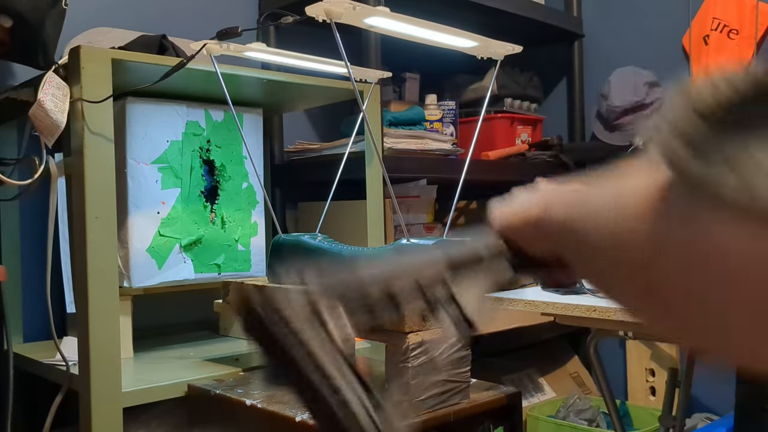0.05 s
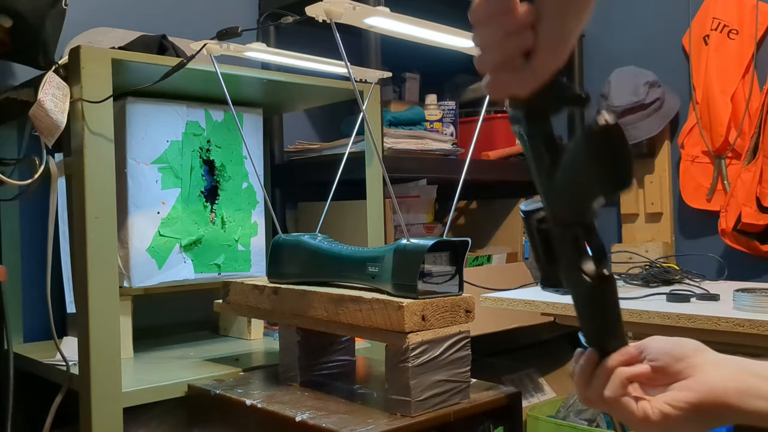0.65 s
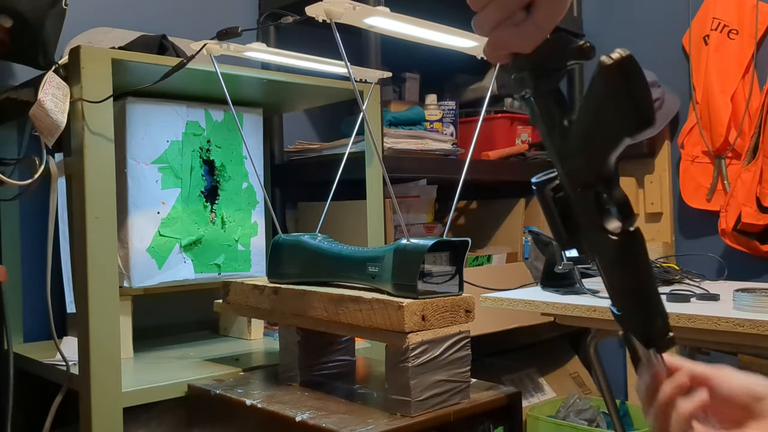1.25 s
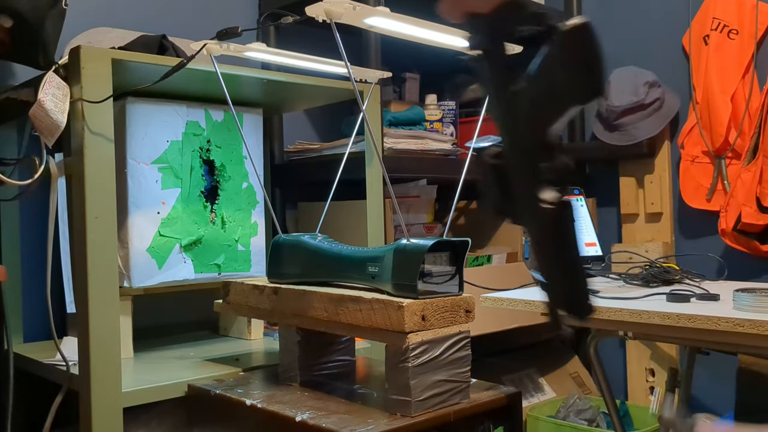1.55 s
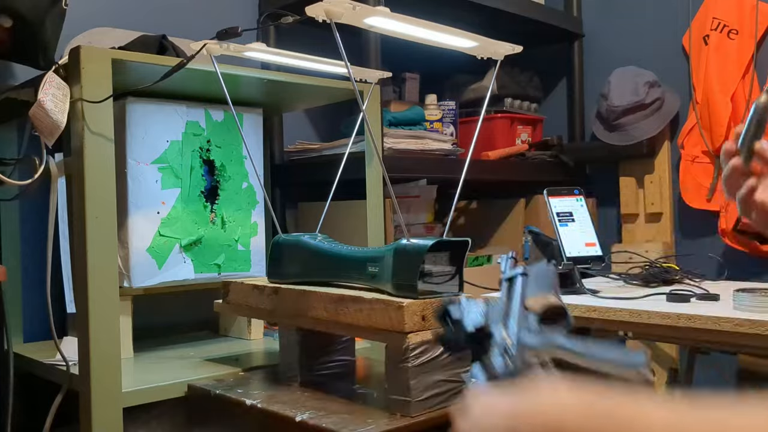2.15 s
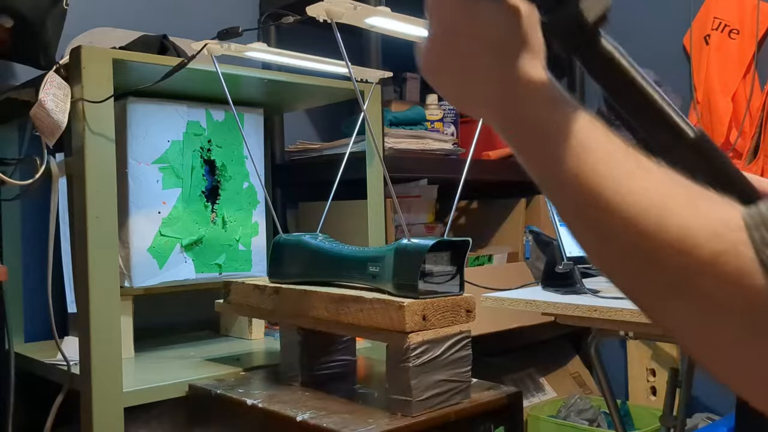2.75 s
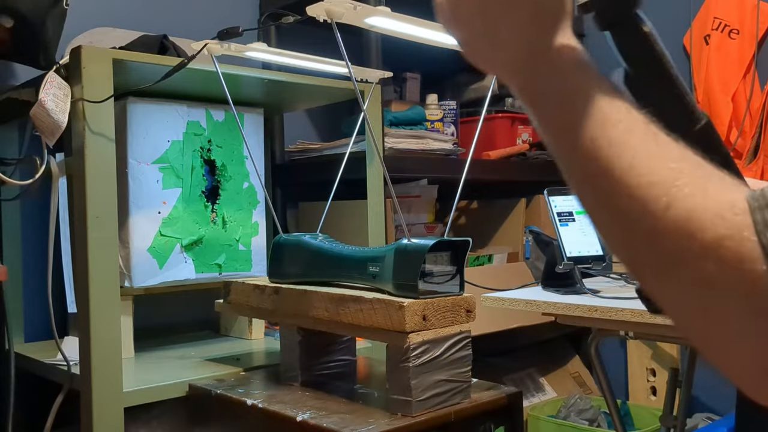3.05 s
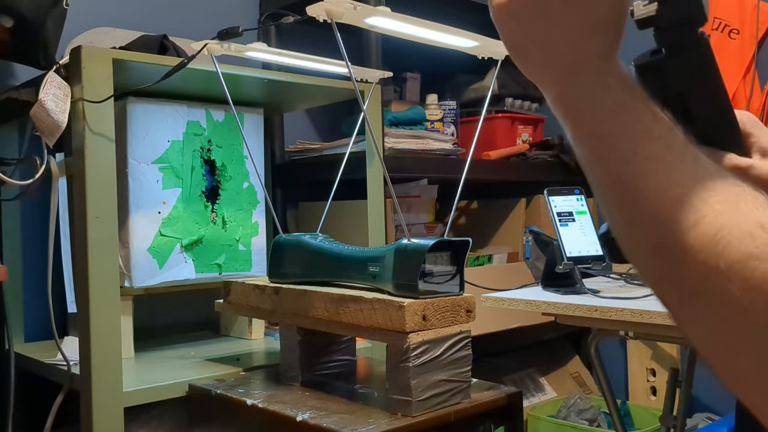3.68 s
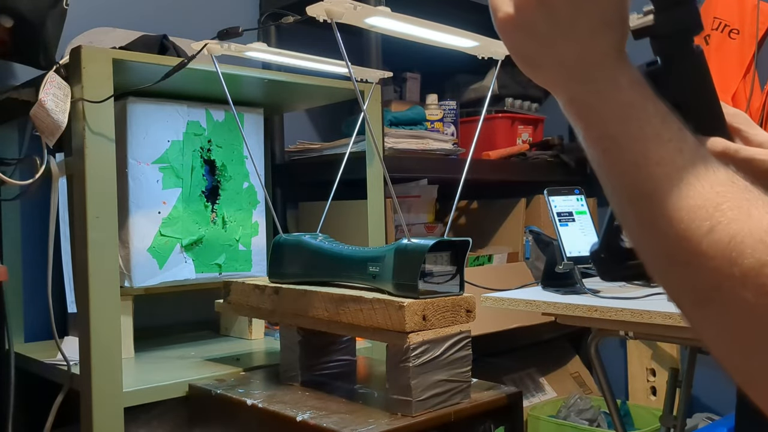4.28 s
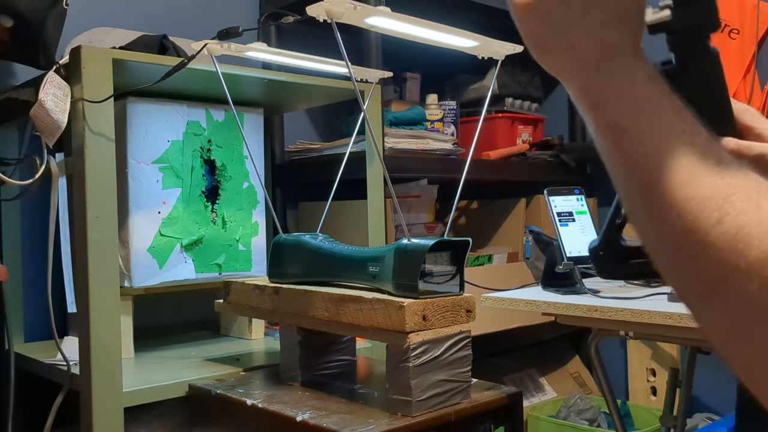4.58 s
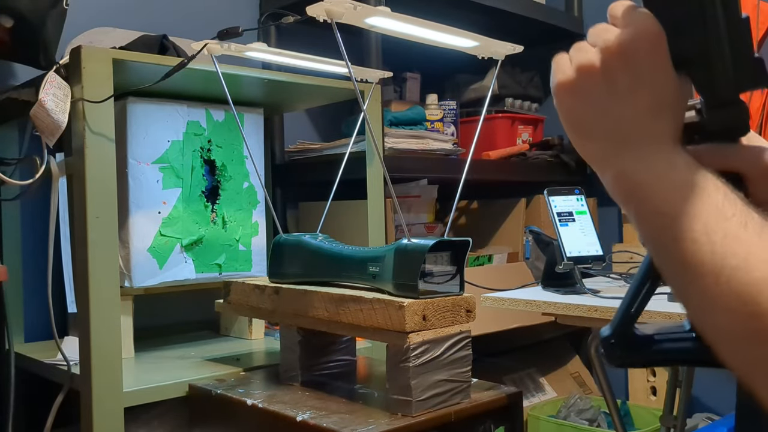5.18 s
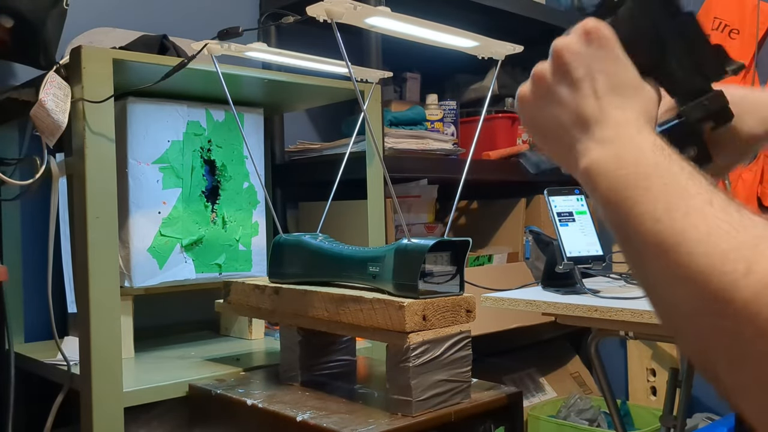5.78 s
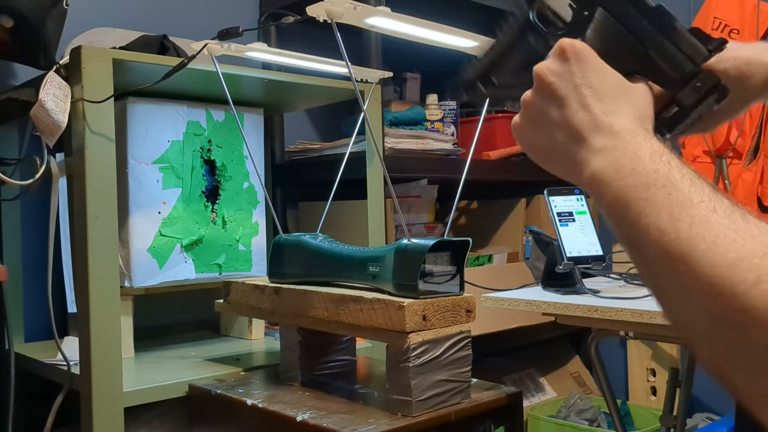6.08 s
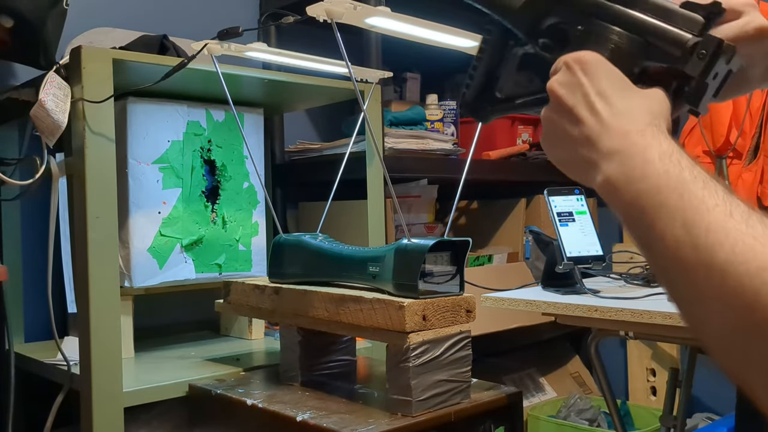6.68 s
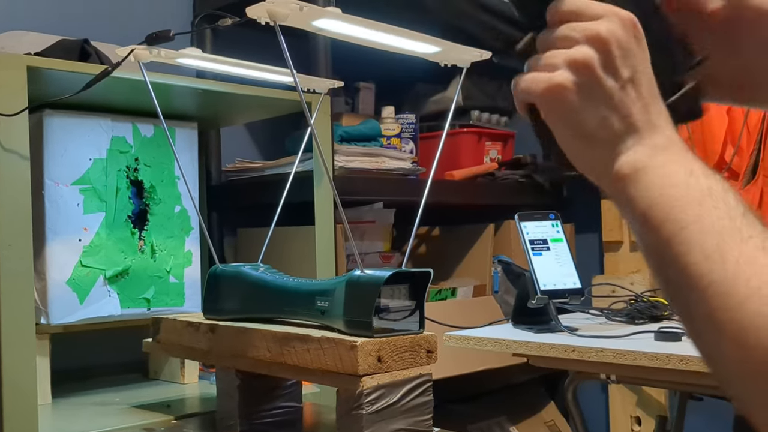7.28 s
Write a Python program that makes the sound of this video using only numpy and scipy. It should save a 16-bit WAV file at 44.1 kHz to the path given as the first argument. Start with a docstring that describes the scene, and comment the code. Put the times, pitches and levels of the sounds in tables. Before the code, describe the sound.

A bolt-action air pistol is handled in a small room with little echo, heard in stereo over a faint, wavering low hum and soft hiss. Light metal rubs and ticks come between 0.4 and 0.8 seconds, then a quick cluster of clicks around 1.3. After a pause, small ringing clicks run from 2.7 to 3.2 seconds. At about 3.4 the bolt scrapes back against its spring with a faint squeak, stopping with a firm click at 3.6. At about 4.3 seconds the pistol dry-fires with one sharp, briefly ringing metallic snap, the loudest sound. A short latch scrape follows at 5.4, light clicks around 5.7, a soft low bump near 6 and more clicks at 6.2. A lever swings with a scrape and latches at about 6.5 seconds. One faint tick at 7 leaves only the hum and hiss.

```python
"""A workbench in a small, cluttered room, with a stereo pair of microphones on a bolt-action air pistol.
The pistol is handled, cocked and dry-fired. Its parts rub, click and ring; the bolt scrapes and squeaks
back against its spring; the hammer lands on the valve with one sharp snap; a lever swings and latches.
Under it all lie a wavering hum near mains pitch and the faint hiss of the room."""
import sys
import numpy as np
from scipy import signal
from scipy.fft import rfft, irfft
from scipy.io import wavfile
from scipy.ndimage import uniform_filter1d

SR = 44100
rng = np.random.default_rng(int(sys.argv[2]) if len(sys.argv) > 2 else 0)


def wrap_up_sound(samples):
    """Save the sound to the file named by the first command line argument, as 16-bit audio."""
    columns = np.atleast_2d(samples).T
    # keep every value between -1 and 1, then stretch to whole-number steps
    tamed = np.clip(columns, -1, 1)
    steps = np.round(tamed * 32767).astype(np.int16)
    wavfile.write(sys.argv[1], SR, steps)


N = 332334
COCK_START_S, COCK_PEAK_S, COCK_STOP_S = 3.335, 3.415, 3.63


def from_db(db):
    return 10 ** (np.asarray(db) / 20)


def rms_one(x):
    return x / np.sqrt(np.mean(x ** 2) + 1e-20)


def in_time(rows):
    return np.interp(np.arange(N) / SR, *np.transpose(rows))


def at_hz(points, hz):
    """Read a table on a logarithmic frequency axis."""
    f, value = np.transpose(points)
    return np.interp(np.log(np.maximum(hz, 1)), np.log(f), value)


def add(track, start_s, sound):
    i = int(round(start_s * SR))
    track[i:i + len(sound)] += sound[:N - i]


def coloured(burst, colour, smooth_bins=50, size=16384):
    """Causal filter that gives a burst the spectrum asked for and leaves its grain in time."""
    spectrum = rfft(burst, size)
    hz = np.arange(len(spectrum)) * SR / size
    broad_power = np.abs(uniform_filter1d(np.abs(spectrum) ** 2, smooth_bins)) + 1e-12
    gain = from_db(at_hz(colour, hz)) / np.sqrt(broad_power)
    cepstrum = irfft(np.log(gain))
    cepstrum[1:size // 2] *= 2   # fold to minimum phase
    cepstrum[size // 2 + 1:] = 0
    return irfft(spectrum * np.exp(rfft(cepstrum)))


def resonate(x, modes):
    """Sum of two-pole resonances driven by x."""
    out = 0
    for hz, width, db in modes:
        r = np.exp(-np.pi * width / SR)
        poles = [1, -2 * r * np.cos(2 * np.pi * hz / SR), r * r]
        out = out + from_db(db) * signal.lfilter([(1 - r * r) / 2, 0, (r * r - 1) / 2], poles, x + 1e-18)
    return out


def diffuse(count, colour):
    """Noise from all sides: alike at both microphones in the bass, unrelated in the treble."""
    # Each row: frequency in Hz, likeness of left and right from 0 to 1.
    likeness = [(100, 0.9), (300, .8), (600, 0.3), (1200, 0), (3000, 0.05), (16000, 0)]
    hz = np.fft.rfftfreq(count, 1 / SR)
    alike = at_hz(likeness, hz)
    mid, side = rfft(rng.standard_normal((2, count)))
    pair = np.sqrt(1 + alike) * mid + np.sqrt(1 - alike) * side * [[1], [-1]]
    return irfft(from_db(at_hz(colour, hz)) * pair, count)


def hum():
    """Two low tones near mains pitch beat slowly against each other, with a few brief dips."""
    # The hum's level: it wavers, and steps down suddenly near 2.6 s.
    # Each row: time in seconds, level in dB.
    levels = [(0, -45.5), (1.15, -43), (2.0, -46), (2.24, -52.5), (2.56, -44.5), (2.68, -50), (3.28, -51.5),
              (3.56, -45), (4.0, -48), (5.4, -48), (5.85, -50.5), (7.05, -48), (7.35, -54)]
    # Each row: time of a dip in seconds, depth in dB.
    dips = [(.6, 15), (1.44, 3.5), (2.16, 5), (5.7, 5.5), (7.28, 3)]
    pitch_hz, beat_hz, upper_db = 58.7, 1.386, -15
    opposed_s, dip_width_s = 4.97, 0.036
    t = np.arange(N) / SR
    lower = np.sin(2 * np.pi * pitch_hz * (t - opposed_s))
    upper = from_db(upper_db) * np.sin(2 * np.pi * (pitch_hz + beat_hz) * (t - opposed_s))
    dip_db = sum(depth * np.exp(-((t - s) / dip_width_s) ** 2) for s, depth in dips)
    lean_left = from_db([[.8], [-.8]])
    return np.sqrt(2) * from_db(in_time(levels) - dip_db) * (lower - upper) * lean_left


def hiss():
    """The still air of the room: a soft hiss with a few narrow bands, growing duller at the end."""
    # Each row: frequency in Hz, relative level in dB.
    colour = [(27, -29), (42, 1), (85, -4), (110, -3.5), (160, -9), (200, -17.5), (290, -17), (450, -23),
              (720, -27), (935, -31), (1440, -25.5), (2230, -26.5), (2760, -31), (5000, -38.5),
              (6600, -39.5), (8000, -45), (12500, -42.5), (15500, -48.5)]
    # Each row: centre of a band in Hz, width in Hz, gain in dB.
    bands = [(107, 13.92, 1), (162.2, 14, 3.5), (229, 7.9, 3.5), (716, 25, 7.5), (2150, 370, -5.5),
             (9830, 770, 3)]
    # Each row: time in seconds, midrange level in dB.
    levels = [(0, -65.5), (2.59, -67.8), (2.66, -73.5), (3.3, -71.5), (6.5, -70.5), (7.54, -72.5)]
    dull_from_s, dull_db_per_s, dull_above_hz = 7.09, 5, 4000
    air = diffuse(N, colour)
    air = air + resonate(air, bands)
    midrange = signal.sosfilt(signal.butter(4, [300, 6000], "band", fs=SR, output="sos"), air.mean(axis=0))
    low = signal.sosfilt(signal.butter(1, dull_above_hz, fs=SR, output="sos"), air)
    treble_gain = from_db(-dull_db_per_s * np.maximum(np.arange(N) / SR - dull_from_s, 0))
    return (low + treble_gain * (air - low)) / np.std(midrange) * from_db(in_time(levels))


def grit(count, spread_db):
    """Tiny contacts of very unequal strength."""
    return rng.standard_normal(count) * from_db(spread_db * np.minimum(rng.exponential(1, count), 5))


def friction(pressure, spread_db):
    """Grit that catches unevenly under a changing pressure."""
    t = np.arange(len(pressure)) / SR
    catch_db = 3.4 * np.interp(t * 300, np.arange(200), rng.standard_normal(200))
    return pressure * from_db(catch_db) * grit(SR // 2, spread_db)[:len(t)]


def part_colour(level, knock, hollow, edge, sparkle):
    """Small parts radiate well at 1.5-3 kHz and hardly at all in the bass."""
    shape = [(120, knock - 16), (330, knock - 4), (650, knock + 1), (950, hollow), (1150, hollow - 1),
             (1550, 0.43), (2400, 0.81), (3600, edge / 3 - 1), (5200, edge), (6600, edge),
             (7900, (edge + sparkle) / 2 - 3), (9600, sparkle + 1), (13000, sparkle - 1),
             (16000, sparkle - 8)]
    return [(hz, level + db) for hz, db in shape]


def touch(excitation, level_db, body_db, bright_db, part):
    """Contact noise in a part's own tone, plus its ring; a heavy touch adds body, a hard one treble."""
    # For each part, in dB against 2 kHz: knock at 500 Hz, hollow at 1 kHz, edge at 5.5, sparkle at 11.
    tones = {"tube": (-16, -12, -19, -13.5), "cap": (-20, 4.5, -35, -18), "pin": (1, 6, -11.5, -13),
             "bolt": (-4, 5.5, -4, -4), "spring": (-13.5, -2, -15, -20.5),
             "frame": (-13.5, -4.5, -10.5, -10), "latch": (-6.5, -7.5, -8, -12),
             "lever": (-9.5, -3, -15.5, -27.5)}
    # Each part's resonances. Each row: frequency in Hz, width in Hz, dB above the contact noise.
    modes = { "tube": [(1550, 190, 3), (1865, 140, 3.5), (3550, 200, 9), (4430, 240, 1), (7500, 87, 14),
             (8600, 200, 14), (13100, 230, 6)], "cap": [(1050, 88, 3), (1680, 79, 22)],
             "pin": [(1040, 230, 3), (3620, 200, 14), (4030, 140, 18.5), (6300, 550, 12)],
             "bolt": [(983, 120, 2), (2950, 140, 3.5), (3540, 330, 3), (6500, 400, -19), (9900, 1200, -5)],
             "spring": [(1125, 175, 8.5), (1680, 130, 4), (2370, 370, 1), (3270, 170, 0.5), (3650, 140, -2),
             (6360, 170, -10)], "frame": [(2120, 330, 0.5), (2710, 130, -13), (3350, 240, 1),
             (4100, 540, -4), (6700, 220, 2.5), (9700, 550, -6)], "latch": [(1177, 124, 11), (2160, 126, 0),
             (2730, 146, 2), (3870, 150, -2), (6670, 230, -17)], "lever": [(694, 47, 12.5), (1307, 176, 9),
             (2540, 280, 0), (3300, 450, 4.5), (4090, 240, -2), (11800, 700, -5)], }
    knock, hollow, edge, sparkle = tones[part]
    colour = part_colour(level_db, knock + body_db, hollow + body_db, edge + bright_db, sparkle + bright_db)
    contact = coloured(excitation, colour)
    return contact + resonate(contact, modes[part])


def slides():
    """Parts rub along each other; the friction swells and fades over each stroke."""
    # Each row: start and length in seconds; relative level, extra body and brightness in dB; part.
    strokes = [(0.409, 0.07, -25.5, 12, 4.5, "tube"), (0.714, 0.12, -14, -9.5, -21, "spring"),
               (1.179, 0.059, -18, 1, 5.5, "tube"), (1.253, 0.044, -12.5, 3, 1.5, "tube"),
               (3.411, 0.26, -8.5, 0.5, 5, "spring"), (3.89, 0.091, -33, 3, 12.5, "frame"),
               (4.715, 0.19, -30, -3, 15, "frame"), (5.354, 0.023, 0, 0.5, 0, "latch"),
               (5.423, 0.011, -8.5, 2, -16, "frame"), (5.704, 0.017, -8, -4.5, 3.5, "lever"),
               (6.429, .08, -12.5, 3, -16, "lever"), (6.488, 0.062, -5, 0.5, 3.5, "lever"),
               (6.518, .02, 0, -6, -13, "frame")]
    out = np.zeros(N)
    for start, length, *contact in strokes:
        t = np.arange(int(length * SR)) / SR
        pressure = np.abs(np.sin(np.pi * t / length)) ** 0.59
        add(out, start, touch(friction(pressure, spread_db=6.0), *contact))
    return out


def clicks():
    """Parts meet: a first contact and a few milliseconds of chatter set them ringing."""
    # Each row: start and decay in seconds; relative level, extra body and brightness in dB; part.
    touches = [(.477, .002, -22.5, 5, -10, "tube"), (.638, 0.0022, -20, 0, -6.5, "tube"),
               (1.242, 0.0019, -11, -4, -4, "tube"), (1.261, 0.0017, -8.5, -3, -1, "tube"),
               (1.276, .002, -12, -11, -3, "frame"), (1.297, 0.0024, -24, -6, 2, "tube"),
               (1.333, 0.0019, -21.5, -0.5, -4, "cap"), (2.631, 0.0026, -39.5, 9, 2, "cap"),
               (2.7133, 0.0061, -21, -0.5, -0.5, "pin"), (2.817, 0.0053, -26.5, 6, -16, "bolt"),
               (2.856, .005, -26.5, -2.5, 0.5, "pin"), (3.0355, 0.0038, -15.5, 1.5, 7, "bolt"),
               (3.151, 0.0087, -19.5, -2, 4, "bolt"), (3.191, 0.0052, -15, 3, -2.5, "bolt"),
               (3.206, 0.0036, -10, -5.5, -13, "bolt"), (3.568, 0.0034, -17, -13, 6.5, "spring"),
               (3.632, 0.0054, -2.5, -0.5, -0.5, "frame"), (3.785, .006, -31.5, 8, -5, "frame"),
               (4.094, .003, -33.5, 8, -1, "frame"), (4.683, 0.0052, -37, 0, 9, "frame"),
               (5.7107, 0.00091, -19, -10, -6, "pin"), (5.715, .0005, -13.5, -16, -3, "lever"),
               (5.8148, .0035, -19, 3, 7.5, "frame"), (6.197, .00036, -8, 1, -2, "frame"),
               (6.1976, .0005, -11.5, -10.5, 4.5, "lever"), (6.21, 0.0052, -14, 7, -12, "lever"),
               (6.228, 0.0037, -17, 4.5, -8, "lever"), (6.456, .002, -22.5, 8.5, 1, "lever"),
               (7.017, .0022, -29, 1, -1, "lever")]
    out, t = np.zeros(N), np.arange(SR // 10) / SR
    for start, decay, *contact in touches:
        chatter = grit(len(t), spread_db=2.5) * np.exp(-t / decay)
        chatter[0] += 0.11 * np.sqrt(np.sum(chatter ** 2))   # the first contact
        add(out, start, touch(chatter, *contact))
    return out


def cocking():
    """The bolt scrapes back against its spring; the effort peaks, then eases until the stop."""
    build_db_per_s, ease_db_per_s = 244, 140
    out, from_peak = np.zeros(N), np.arange(COCK_START_S, COCK_STOP_S, 1 / SR) - COCK_PEAK_S
    effort = from_db(np.minimum(build_db_per_s * from_peak, -ease_db_per_s * from_peak))
    scrape = friction(effort, spread_db=5.0)
    add(out, COCK_START_S, touch(scrape, level_db=0.4, body_db=0, bright_db=-0.5, part="spring"))
    return out


def squeak():
    """The bolt's rough stick-slip tone, renewed by each grab, climbs as the spring tightens."""
    # Each row: start of a grab in seconds, relative level in dB, decay in seconds.
    grabs = [(3.336, -51, 0.022), (3.361, -37.5, 0.014), (3.435, -45, .07)]
    rest_hz, top_hz, climb_hz_per_s = 917, 1330, 2700
    bolt_moves_s, attack_s = 3.366, 0.0017
    out, t = np.zeros(N), np.arange(COCK_START_S, COCK_STOP_S, 1 / SR)
    wander, flutter = (np.interp(t * 400, np.arange(3200), row) for row in rng.standard_normal((2, 3200)))
    hz = np.clip(rest_hz + climb_hz_per_s * (t - bolt_moves_s), rest_hz, top_hz)
    phase = 2 * np.pi * np.cumsum(hz * (1 + 0.055 * wander)) / SR
    level = sum(from_db(db) * np.clip((t - s) / attack_s, 0, 1) * np.exp(-np.abs(t - s) / decay)
                for s, db, decay in grabs)
    add(out, COCK_START_S, level * from_db(1.8 * flutter) * np.sin(phase))
    return out


def snap():
    """The hammer strikes the valve and rebounds; it alone is strong enough to ring the whole receiver."""
    # Landing and rebounds. Each row: start in seconds, decay in seconds, relative strength in dB.
    hammer = [(4.3466, 0.00088, 2.5), (4.3482, 0.0011, -1.5), (4.3515, 0.0018, -3), (4.352, 0.0012, -2.5),
              (4.3533, 0.0017, -5)]
    # Colour of the whole blow. Each row: frequency in Hz, relative level in dB.
    colour = [(100, -20), (250, -2.5), (450, 7), (700, 2.5), (1100, 10), (1900, 13.5), (2700, 11.5),
              (4700, 15.5), (6200, 15), (7600, 7.5), (9300, 10), (11000, 7.5), (13000, 5.5), (15500, -2)]
    # Receiver and barrel resonances. Each row: frequency in Hz, width in Hz, relative gain in dB.
    receiver = [(2060, 62, 10), (2208, 86, 8.5), (2891, 50, 2), (3050, 27, 0.5), (3773, 51, 2.5),
                (4134, 80, 2.5), (4576, 26, 5), (4804, 100, 1.5), (6100, 40, 1.5), (6400, 34, 3.5),
                (8700, 50, 3), (9330, 120, 1.5), (10400, 50, 1.5), (12300, 120, -0.5)]
    blows, strike, t = np.zeros(SR // 10), np.zeros(N), np.arange(SR // 20) / SR
    landing_s = min(row[0] for row in hammer)
    for start, decay, db in hammer:
        add(blows, start - landing_s, from_db(db) * rng.choice([-1, 1], len(t)) * np.exp(-t / decay))
    add(strike, landing_s, coloured(blows, colour, smooth_bins=30))
    return strike + from_db(-1.5) * resonate(strike, receiver)


def bump():
    """A padded knock as the pistol is turned over: a few cycles of one low resonance."""
    # Start in seconds, length in seconds, pitch in Hz, level in dB.
    knock = (5.951, .048, 153, -40)
    start, length, hz, db = knock
    out, t = np.zeros(N), np.arange(int(length * SR)) / SR
    swell = np.abs(np.sin(np.pi * t / length)) ** 0.52
    add(out, start, from_db(db) * swell * np.sin(2 * np.pi * hz * t))
    return out


def room(x, direct_db, early_db, early_s, left_db):
    """The microphones hear the direct sound, reflections off bench and shelves, and a short tail."""
    # Each row: frequency in Hz, reverberation time in seconds.
    decay_times = [(200, 0.39), (700, 0.13), (2000, 0.13), (5000, 0.15), (10000, 0.16), (16000, 0.0636)]
    t = np.arange(SR // 3) / SR
    flat = [(20, 0), (20000, 0)]
    noise = rfft(diffuse(len(t), flat))
    hz, tail = np.fft.rfftfreq(len(t), 1 / SR), 0
    for centre, t60 in decay_times:
        band = at_hz([(f, float(f == centre)) for f, _ in decay_times], hz)
        tail = tail + irfft(noise * band, len(t)) * from_db(-60 * t / t60)
    early_lift = 1 + from_db(early_db) * np.exp(-t / early_s)
    response = rms_one(tail * early_lift) / np.sqrt(len(t))
    response[[0, 1], [3, 0]] += from_db(direct_db)   # reaches the right microphone 3 samples sooner
    # the many reflections favour no broad band, so each response is evened out
    evened = [coloured(side, flat, smooth_bins=90) for side in response]
    pair = np.array([signal.fftconvolve(x, side)[:N] for side in evened])
    return pair * from_db([[left_db / 2], [-left_db / 2]])


def scene():
    """Handling and snap sound in the room, a little louder on the left, over hum and hiss."""
    handling = from_db(-0.47) * (clicks() + slides() + cocking() + squeak())
    shot = snap()
    return (room(handling, direct_db=-8.5, early_db=1.5, early_s=0.0025, left_db=1.5)
            + room(shot, direct_db=-10.0, early_db=6.0, early_s=0.0025, left_db=2.0)
            + bump() + hum() + hiss())


def record(dry):
    """The highest peaks are rounded and the top treble is cut steeply."""
    ceiling, cutoff_hz = 0.8, 15800
    rounded = ceiling * np.tanh(dry / ceiling)
    return signal.sosfilt(signal.ellip(10, .2, 80, cutoff_hz, fs=SR, output="sos"), rounded)


dry = scene()
out = record(dry)
wrap_up_sound(out)
```